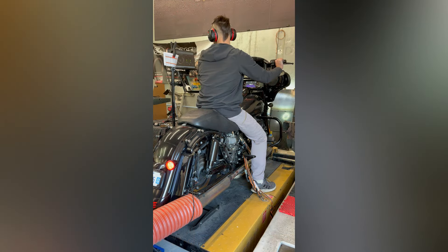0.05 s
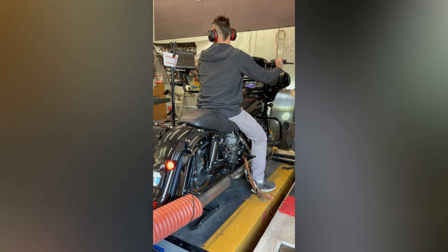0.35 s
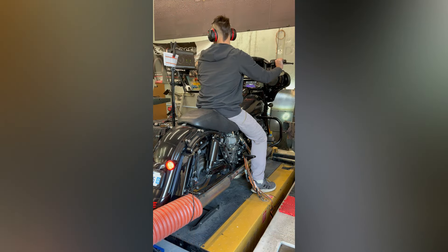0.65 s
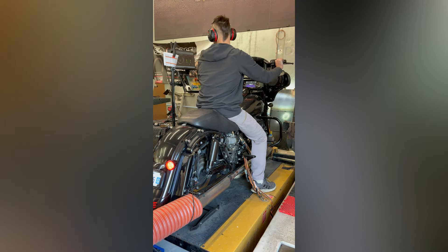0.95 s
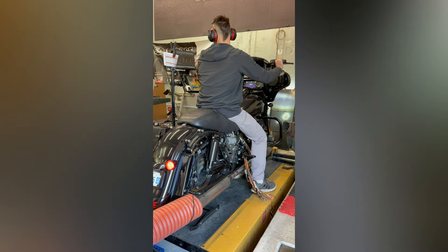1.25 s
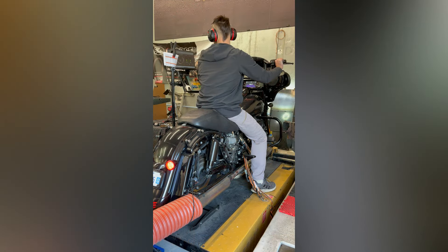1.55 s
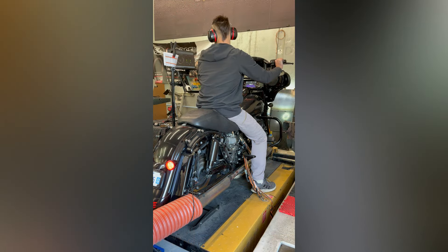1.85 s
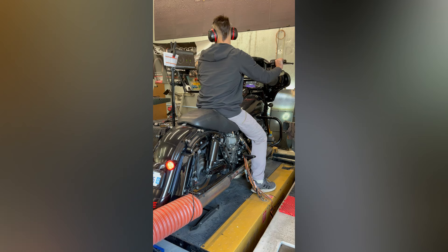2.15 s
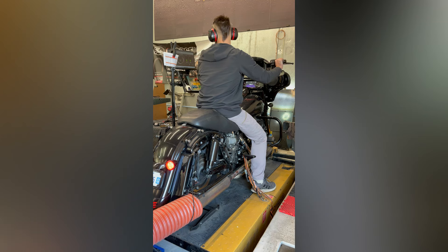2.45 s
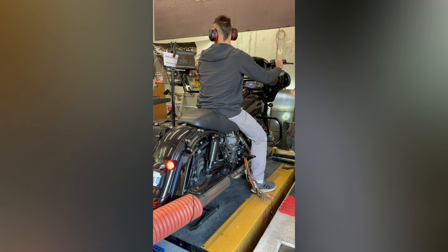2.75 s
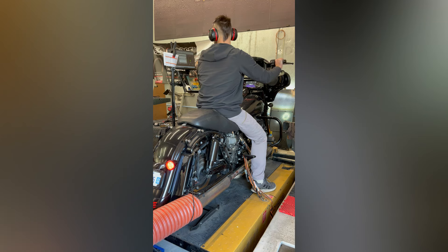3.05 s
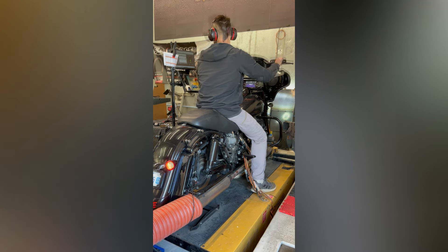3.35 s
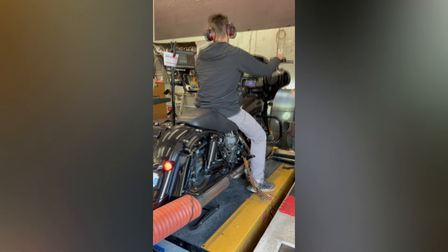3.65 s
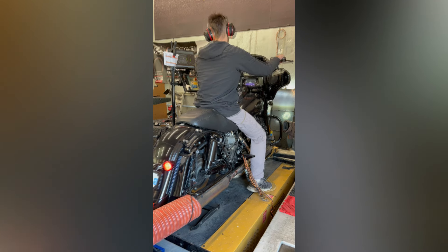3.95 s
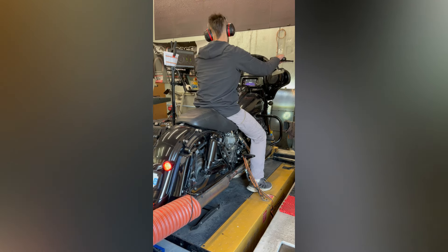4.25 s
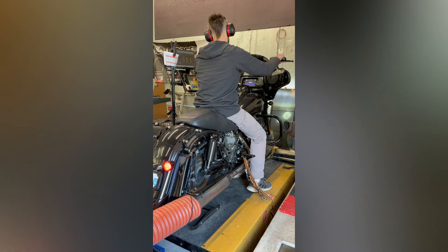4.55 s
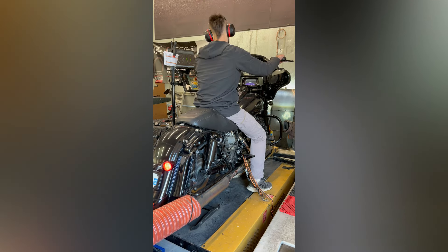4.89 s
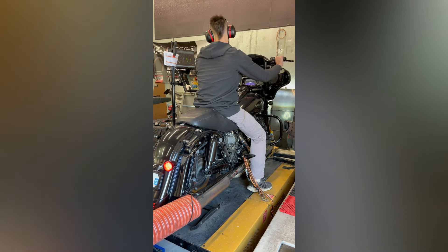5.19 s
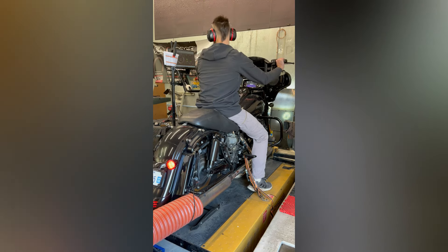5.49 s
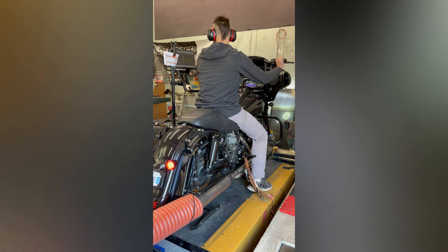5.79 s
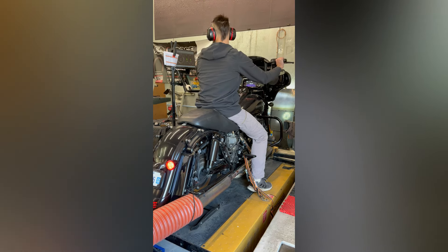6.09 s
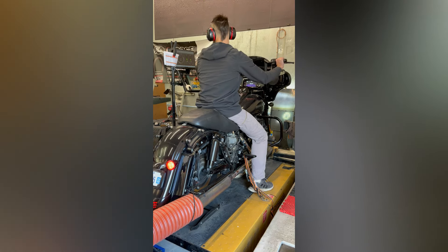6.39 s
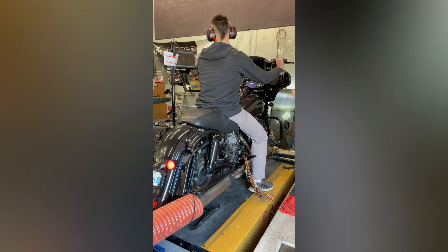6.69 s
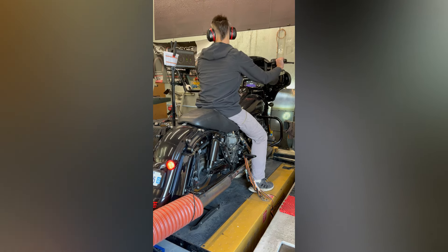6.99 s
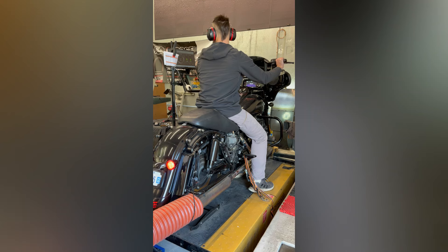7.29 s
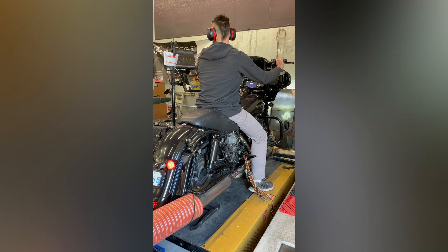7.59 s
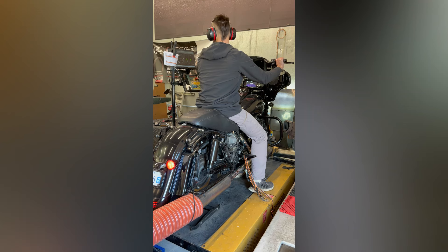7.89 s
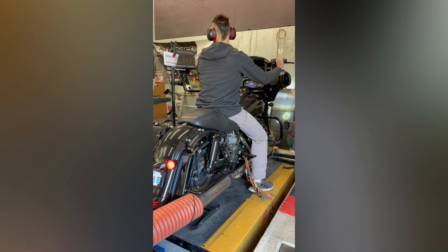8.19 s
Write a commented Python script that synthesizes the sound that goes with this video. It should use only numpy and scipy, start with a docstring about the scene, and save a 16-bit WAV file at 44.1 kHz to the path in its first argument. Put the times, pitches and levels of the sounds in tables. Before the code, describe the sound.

A big twin-cylinder motorcycle holds steady revs in a workshop, shifts up, burbles and pops, then roars up on full throttle.

```python
"""A big V-twin motorcycle runs on the rollers of a test stand in a small workshop.
It holds its speed, shifts up, burbles at low revs, then pulls hard on full throttle.
Its two cylinders fire unevenly spaced pulses that ring the exhaust pipe, crack and blow rasping gas.
A click and a knock come as the revs drop; then unburnt fuel pops in the pipe. Underneath, valves tick,
the drive belt's teeth sing, the roller whines and tyre and air rush. The close walls add a short echo."""
import sys
import numpy as np
from scipy import signal
from scipy.fft import rfft, irfft
from scipy.io import wavfile
from scipy.ndimage import uniform_filter1d

SR = 44100
rng = np.random.default_rng(int(sys.argv[2]) if len(sys.argv) > 2 else 0)


def store_pcm(level_fs):
    """Save levels as 16-bit WAV."""
    pcm = np.round(np.clip(level_fs, -1, 1) * 32767).astype(np.int16)
    wavfile.write(sys.argv[1], SR, np.atleast_2d(pcm).T)


N = 372041
T = np.arange(N) / SR
HZ = np.maximum(np.fft.rfftfreq(16384, 1 / SR), 1)  # a filter is one gain for each of these frequencies
# Engine speed ("revs") counts cycles per second. In one cycle each cylinder fires once.
LUGGING_HZ, SMOOTH_HZ, MIDDLE_HZ = 15.57, 20.83, 21  # lugging means labouring at low revs
SHIFT_S = 3.757  # the higher gear goes in


def undb(db):
    """Turn decibels into a gain."""
    return 10 ** (np.asarray(db) / 20)


def curves(table):
    """Join a table's rows with straight lines in time, giving one curve per value column."""
    seconds, *columns = np.transpose(table)
    return [np.interp(T, seconds, column) for column in columns]


def below(hz):
    """A filter that keeps what lies below hz; one minus it keeps what lies above."""
    return 1 / (1 + (HZ / hz) ** 10)


def colour(points):
    """A filter drawn through (Hz, dB) points."""
    hz, db = np.transpose(points)
    return undb(np.interp(np.log(HZ), np.log(hz), db))


def resonances(table):
    """A filter with one peak for each (Hz, width in Hz, dB) row."""
    return sum(undb(db) / (1 + (2 * (HZ - hz) / width) ** 2) for hz, width, db in table)


def ring(x, gain):
    """Filter x so that the ringing comes after each hit, never before (minimum phase)."""
    cepstrum = irfft(np.log(gain + 1e-6))
    cepstrum[1:len(HZ) - 1] *= 2
    cepstrum[len(HZ):] = 0
    return signal.oaconvolve(x, irfft(np.exp(rfft(cepstrum))))[:N]


def band(x, gain):
    """Filter x, adding no delay beyond any that the gain itself holds."""
    kernel = np.fft.fftshift(irfft(gain))[1:]
    return signal.oaconvolve(np.pad(x, len(kernel) // 2, "reflect"), kernel, "valid")


def delay(lag_s):
    """A filter that delays all frequencies alike."""
    return np.exp(-2j * np.pi * HZ * lag_s)


def delay_lows(lag_s, corner_hz):
    """A filter that delays the lows by lag_s, and the highs above the corner less and less."""
    return np.exp(-2j * np.pi * lag_s * corner_hz * np.arctan(HZ / corner_hz))


def even(x, size=9000):
    """Hold the average strength of x at 1, smoothing over size samples."""
    return x / np.sqrt(uniform_filter1d(uniform_filter1d(x ** 2, size), size) + 1e-14)


def strikes(times, sizes):
    """One-sample clicks at the given times."""
    out = np.zeros(N)
    np.add.at(out, np.clip(np.round(times * SR).astype(int), 0, N - 1), sizes)
    return out


def puff(x, rise_s, decay_s):
    """Turn each click into a quick swell and a slower fade."""
    t = T[:SR // 8]
    return signal.oaconvolve(x, (1 - np.exp(-t / rise_s)) * np.exp(-t / decay_s))[:N]


def noise():
    """White noise."""
    return rng.standard_normal(N)


def flutter(angle, width_hz):
    """A tone whose strength and phase wander at random."""
    return sum(wave(angle) * even(ring(noise(), below(width_hz))) for wave in (np.sin, np.cos))


def effort(throttle, speed, db, throttle_db, revs_db):
    """A gain of db at full throttle and middle revs, plus so many dB for each doubling of either."""
    return undb(db + throttle_db * np.log2(throttle) + revs_db * np.log2(speed / MIDDLE_HZ))


def by_revs(speed, smooth, lugging):
    """Slide from the smooth value to the lugging value as the revs drop."""
    return np.interp(speed, (LUGGING_HZ, SMOOTH_HZ), (lugging, smooth))


def once_a_cycle(place, speed):
    """The times at which the engine passes this place (0 to 1) in its cycle."""
    cycles = np.cumsum(speed) / SR
    return np.interp(np.arange(place, cycles[-1]), cycles, T)


# How much sound goes into the room's echo. Each row: frequency in Hz, level in dB.
ECHO_TONE = [(60, -26), (125, -25), (250, -10.5), (500, -2.5), (750, -7), (1100, -7), (2000, -1),
             (5000, -1), (9000, -4)]

def workshop(x, fade_60db_s=0.78):
    """Close walls add a short echo, a little different on the left and on the right."""
    t = T[:SR // 2]
    tails = rng.standard_normal((2, len(t))) * np.exp(-np.log(1000) * t / fade_60db_s) * (t > .002)
    shared, apart = tails / np.sqrt(2 * np.sum(tails ** 2, axis=1, keepdims=True))
    tails = .85 * shared + apart * np.array([[1], [-1]])
    echo = signal.fftconvolve(ring(x, colour(ECHO_TONE))[None], tails, axes=1)[:, :N]
    left = ring(x, colour([(60, -4.5), (250, 2.0), (500, -0.5), (2000, -3.0), (9000, -2.5)]))
    right = band(left, delay_lows(.00005, 5050))  # the far side hears it a moment later
    return np.array([left, right]) + echo


# A steady rushing noise, with two narrow gaps cut in the treble near 6 and 10 kHz.
# Each row: frequency in Hz, relative level in dB.
RUSH_TONE = [(20, -37), (60, -6), (200, -5), (350, -8), (560, -13), (700, -13), (1050, -12), (1600, -16),
             (2400, -21), (5000, -26), (6100, -42.5), (8000, -25), (10200, -60), (12800, -34), (15500, -50)]

def tyre_rush(throttle):
    """Tyre, belt and cooling air rush without a beat; they ease when the throttle is almost shut."""
    middle, side = (even(ring(noise(), colour(RUSH_TONE))) for _ in range(2))
    stereo = middle + undb(-2.5) * side * np.array([[1], [-1]])
    return stereo * undb(-33.5) * np.tanh(throttle / .08)


# The roller's whine. Each row: time in seconds, pitch in Hz, relative level in dB.
ROLLER_WHINE = [(0, 532, -32), (1.6, 524, -29.5), (3.2, 518, -32.5), (3.62, 497, -35), (4, 492, -32.5),
                (4.9, 488, -32), (5.3, 495, -39), (6, 500, -50)]

def roller_whine():
    """The spinning roller sings a tone that is part steady, part fluttering."""
    hz, db = curves(ROLLER_WHINE)
    angle = 2 * np.pi * np.cumsum(hz) / SR
    return (undb(-3) * np.sin(angle) + undb(-4.5) * flutter(angle, width_hz=28)) * undb(db)


# The belt sings once it takes the load in the higher gear.
# Each row: time in seconds, level in dB, flutter (0 is a pure tone, 1 or more is all flutter).
BELT_SONG = [(3.72, -60, 0.3), (3.95, -34.5, 0.1), (4.3, -31, 0.4), (5.1, -34, 0.2), (5.4, -27, 0.6),
             (7.05, -29.5, 0.86), (7.5, -35, 1.1), (8.44, -32, 0.8)]

def drive_belt(speed, teeth_per_cycle=22.5):
    """Meshing teeth make a tone that follows the revs; the two firings a cycle add a tone below it."""
    db, rough = curves(BELT_SONG)
    rough = np.clip(rough, 0, 1)
    steady = np.sqrt(2 * (1 - rough ** 2))
    angle = 2 * np.pi * np.cumsum(speed) / SR
    tones = sum(steady * np.sin(teeth * angle) + rough * flutter(teeth * angle, width_hz=17)
                for teeth in (teeth_per_cycle, teeth_per_cycle - 2))
    return tones * undb(db) / np.sqrt(2)


def click_and_knock():
    """A sharp click and a short, low knock as the revs drop abruptly."""
    start = strikes(np.array([SHIFT_S]), 0.78)
    knock = noise() * puff(start, .0004, .059) * undb(-26)
    click = noise() * puff(start, .0001, .00086) * undb(-23)
    tone = colour([(20, 6), (60, 26), (150, 24), (300, 20), (600, 14), (2000, -3), (15000, -28)])
    return click + ring(knock, tone)


# How the valve parts ring. Each row: pitch in Hz, width in Hz, relative level in dB.
VALVE_RINGS = [(2940, 460, -1.5), (3850, 750, 8), (4920, 700, -5), (8700, 2400, -14), (13500, 830, -12)]

def valve_ticks(throttle, speed):
    """The valves give one short metallic tick each cycle, some much harder than others."""
    times = once_a_cycle(.245, speed)
    taps = strikes(times, undb(3 * rng.standard_normal(len(times))))
    ticks = even(ring(noise() * puff(taps, .0001, .0022), resonances(VALVE_RINGS)), size=22000)
    level = effort(throttle, speed, db=-31.5, throttle_db=6.2, revs_db=-10)
    return ticks * level * by_revs(speed, smooth=1, lugging=.4)


def gas_gargle(speed):
    """Gas churns in the pipe while the engine lugs in the higher gear."""
    tone = colour([(150, -22), (350, 1), (700, 0.5), (1100, -0.5), (2000, -6.5), (3000, -21),
                   (8000, -31)])
    churn = even(ring(noise(), tone))
    return churn * undb(-33.5) * by_revs(speed, smooth=0, lugging=1) * (T > SHIFT_S)


# A rasping hiss, with two narrow gaps cut in the treble near 6 and 10 kHz.
# Each row: frequency in Hz, relative level in dB.
RASP_TONE = [(1200, 9.5), (1700, -8), (2800, -8), (3300, -12), (3900, -11.5), (5000, -10), (6100, -26.5),
             (7000, -17.5), (8300, -14), (10200, -30.5), (11300, -19.5), (13200, -19), (14300, -27),
             (15500, -44)]

def gas_rasp(gas_kicks, throttle, speed):
    """Gas tears out after every firing, crackling over a steady hiss."""
    flow = puff(gas_kicks, .0006, .014) + undb(9)  # the constant is the hiss between puffs
    crackle = noise() * undb(2.5 * np.repeat(noise(), 24)[:N])
    rasp = even(ring(crackle * flow, colour(RASP_TONE) * (1 - below(1387))))
    return rasp * effort(throttle, speed, db=-23.5, throttle_db=7, revs_db=0)


# The louder pops at low revs. Each row: start in seconds, relative level in dB.
LOUD_POPS = [(3.788, -9), (3.828, -9), (4.278, -12), (4.442, -13), (4.483, -11), (4.663, -11), (4.735, -12),
             (4.772, -7), (4.917, -8)]

def fuel_pops(small_count=26, from_s=4.0, to_s=5.15):
    """Unburnt fuel goes off in the pipe: a few loud thumps among a run of small ones."""
    loud_s, loud_db = np.transpose(LOUD_POPS)
    offset, size = rng.random((small_count, 2)).T
    small_s = from_s + (to_s - from_s) * (np.arange(small_count) + offset) / small_count
    blows = strikes(loud_s, undb(loud_db)) + strikes(small_s, undb(-23) * 2 * size)
    tone = colour([(50, -7), (100, 14.5), (160, 4), (330, -2), (520, -2), (800, -14), (4000, -60)])
    return ring(noise() * puff(blows, .002, .014), tone) * undb(8)


def hot_ring(x, gain, speed, rise_per_doubling=.045, wander=.003):
    """Filter x with resonances that drift, and climb with the revs as the gas gets hotter."""
    drift = np.interp(T, np.linspace(0, T[-1], 30), rng.standard_normal(30))
    clock = np.cumsum(1 + rise_per_doubling * np.log2(speed / MIDDLE_HZ) + wander * drift)
    samples = np.arange(N)
    # Stretching, filtering and squeezing back moves the resonances but keeps the timing.
    stretched = np.interp(samples, clock, x)
    return np.interp(clock, samples, band(stretched, gain))


# The paths of each cylinder's crack off bike, platform and walls.
# Each row: delay in seconds, level in dB.
NEAR_ECHOES = [(.0006, 0), (.003, -7), (.0039, -9), (.0059, -7.5), (.0095, -5.5)]
FAR_ECHOES = [(0, -8), (.0012, -7), (.007, -5.5), (.0115, -10)]
# The crack's broad, short-lived resonances. Each row: frequency in Hz, relative level in dB.
CRACK_COLOUR = [(600, 5), (710, 4.5), (770, 6), (840, -2), (945, 1), (1010, 4), (1085, 6.5), (1160, -5.5),
                (1270, 0.5), (1400, -6.5), (1520, -7.5), (2000, -12), (2800, -22.5), (4500, -17),
                (6000, -36)]

def exhaust_crack(shots, throttle, speed):
    """An open throttle steepens each pulse into a hard crack that arrives by a few paths."""
    turbulence = undb(np.interp(throttle, (0, 1), (-39, -31)))
    tone = colour(CRACK_COLOUR) * (1 - below(600)) * below(5700)
    arrivals = 0
    for clicks, paths in zip(shots, (NEAR_ECHOES, FAR_ECHOES)):
        torn = clicks + turbulence * noise() * puff(clicks, .0005, .008)
        echoes = sum(undb(db) * delay(lag_s) for lag_s, db in paths)
        arrivals = arrivals + hot_ring(torn, echoes * tone, speed)
    crack = even(arrivals) * effort(throttle, speed, db=-19.5, throttle_db=5.5, revs_db=0)
    crack /= 1 + (.34 / throttle) ** 4  # on a small throttle the pulses are too weak to steepen
    # A snarl near 1110 Hz swells as the revs pass 29 cycles per second.
    snarl = band(crack, np.exp(-(2 * (HZ - 1110) / 300) ** 2))
    snarl_db = 2.5 * np.exp(-((speed - 29.1) / 4.3) ** 2)
    return crack + snarl * (undb(snarl_db) - 1)


# When the near and the far cylinder fire. Each number: place in the cycle, from 0 to 1.
FIRING_PLACES = [.778, .205]
# The near cylinder, then the far one, whose thump the bike shadows.
# Each row: relative levels in dB of the low thump, the pulse's sharp edge and the gas.
CYLINDER_LEVELS = [(1, 3.5, 24.5), (-5.5, -2.5, 29.5)]

def firings(throttle, speed):
    """Each firing gives a pressure pulse, a kick of gas and a click for the crack; ragged at low revs."""
    pulses, gas_kicks, shots = 0, 0, []
    for place, (thump_db, edge_db, gas_db) in zip(FIRING_PLACES, CYLINDER_LEVELS):
        times = once_a_cycle(place, speed)
        revs = np.interp(times, T, speed)
        size_luck, time_luck, gas_luck = rng.standard_normal((len(times), 3)).T
        jitter_s = by_revs(revs, smooth=.000012, lugging=.0005)
        jitter_s += .00003 * np.interp(times, T, throttle) ** 2
        times = times + time_luck * jitter_s
        shots.append(strikes(times, undb(.9 * size_luck)))
        size = undb(by_revs(revs, smooth=.7, lugging=1.7) * size_luck)
        # A fifth of a cycle later the rising piston pushes out the rest in a soft surge.
        surge = band(strikes(times + .201 / revs, size), np.exp(-(HZ / 170) ** 2)) * undb(-3)
        tone = undb(thump_db) * below(426) + undb(edge_db) * (1 - below(545))
        pulses = pulses + band(strikes(times, size) + surge, tone)
        gas_kicks = gas_kicks + strikes(times, undb(gas_db + 2.5 * gas_luck))
    return pulses, gas_kicks, shots


def close_echoes(x):
    """Echoes between bike, platform and walls fill the gaps between firings; the lows arrive late."""
    gain = delay_lows(.026, 150)
    bounce = .6 * below(1900)
    for lag_s in (.0043, .0089, .0137):
        repeats = (bounce + delay(lag_s)) / (1 + bounce * delay(lag_s))
        gain = gain * (repeats * below(1270) + 1 - below(740))  # the highs pass straight through
    return band(x, gain)


# How the exhaust pipe and its fume hose ring. Each row: pitch in Hz, width in Hz, relative level in dB.
PIPE_RINGS = [(41.3, 13.5, -2.5), (60.65, 9, 4), (81.2, 15.5, -5.5), (96.8, 22, -5), (112, 6, -6),
              (122.7, 28, -4), (145.5, 2.6, -10.5), (161, 10.8, 1), (193.3, 27.2, -1), (198, 48, -17.5),
              (237.8, 15.4, -1), (252.4, 11, -10), (263, 16, -1.5), (308.5, 37, -10), (363.3, 19.5, -10),
              (413, 53, -9), (467.5, 47, -9.5), (514, 48, -9), (629, 25, -8)]
# A roar near 240 Hz that swells and dips. Each row: time in seconds, boost or cut in dB.
ROAR_BOOST = [(0, -2), (3.4, 1.5), (3.9, 0.5), (4.5, -4.5), (5.3, -1), (5.9, 1.5), (6.5, 1.5), (6.85, 1.5),
              (7.12, 4), (7.27, -10), (7.7, 1.5), (8.44, -3)]

def exhaust_pipe(pulses, throttle, speed):
    """Pulses and the swirling gas behind them ring the pipe: a deep drone, a boom and a higher bark."""
    swirl = np.hypot(undb(by_revs(speed, smooth=-51, lugging=-35.5)), undb(-44) * throttle ** 2)
    wake = noise() * puff(pulses, .0014, .02) * swirl
    flow = band(pulses + band(wake, 1 - below(150)), below(3200))
    pipe = ring(close_echoes(flow), resonances(PIPE_RINGS) * (1 - below(39.3)))
    drone = band(pipe, below(71))
    drone *= effort(throttle, speed, db=47.7, throttle_db=.36, revs_db=-1.8)
    drone *= undb(np.interp(T - SHIFT_S, (0, .04), (-9.5, 0)))  # weaker under the low gear's light load
    boom = band(pipe, below(135) - below(71))
    boom *= effort(throttle, speed, db=41.36, throttle_db=1.65, revs_db=-20)
    boom *= undb(np.interp(throttle, (.2, .42), (-6, 0)))  # falls away on a nearly shut throttle
    bark = band(pipe, below(600) - below(135))
    bark *= effort(throttle, speed, db=36.78, throttle_db=3.7, revs_db=-3)
    roar = band(bark, below(295) - below(205)) * (undb(curves(ROAR_BOOST)[0]) - 1)
    return drone + boom + bark + roar


# The revs: cruise, shift up, run low, climb. Each row: time in seconds, engine cycles per second.
ENGINE_SPEED = [(0, 21.156), (3.45, 20.702), (3.7, 19.526), (3.8, 15.421), (5.08, 15.332), (5.9, 19.632),
                (7.3, 28.422), (8.44, 35.35)]
# The throttle: held, shut for the shift, eased on, wide open.
# Each row: time in seconds, opening from 0 to 1.
THROTTLE_OPENING = [(0, 0.45), (2.9, 0.44), (3.44, 0.34), (3.54, 0.03), (3.75, 0.01), (3.78, 0.04),
                    (4.4, 0.16), (5.135, 0.23), (5.2, 1), (7.8, 0.98), (8.44, 0.81)]

def scene():
    """The motorcycle and the roller in the workshop; throttle and revs steer the engine's sounds."""
    speed = curves(ENGINE_SPEED)[0]
    throttle = curves(THROTTLE_OPENING)[0]
    pulses, gas_kicks, shots = firings(throttle, speed)
    engine = exhaust_pipe(pulses, throttle, speed) + exhaust_crack(shots, throttle, speed)
    engine += gas_gargle(speed) + gas_rasp(gas_kicks, throttle, speed)
    engine += valve_ticks(throttle, speed) + fuel_pops()
    drive = roller_whine() + drive_belt(speed)
    return workshop(engine + drive + click_and_knock()) + tyre_rush(throttle)


def record(dry):
    """Round off the highest peaks and cut the treble above 15500 Hz."""
    rounded = dry / (1 + dry ** 6) ** (1 / 6)
    return signal.sosfilt(signal.ellip(8, .2, 70, 15500, fs=SR, output="sos"), rounded)


dry = scene()
out = record(dry)
store_pcm(out)
```